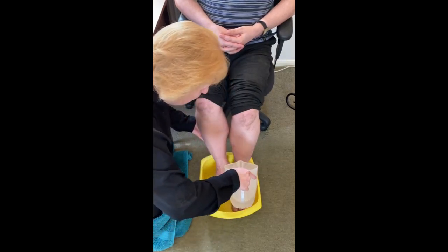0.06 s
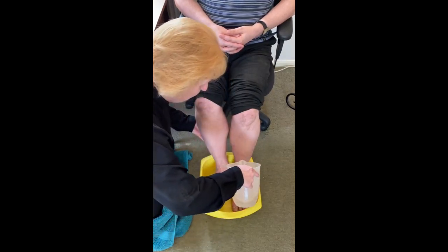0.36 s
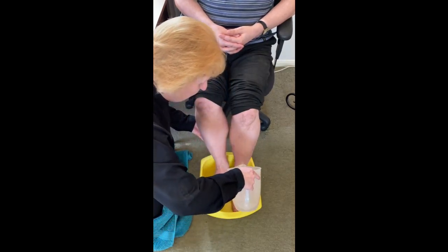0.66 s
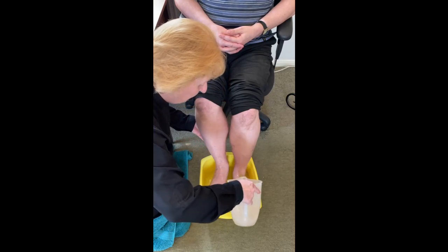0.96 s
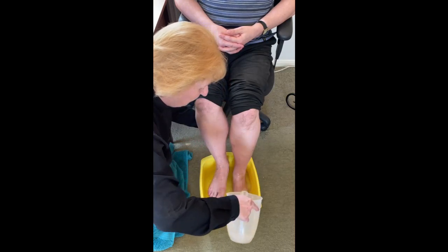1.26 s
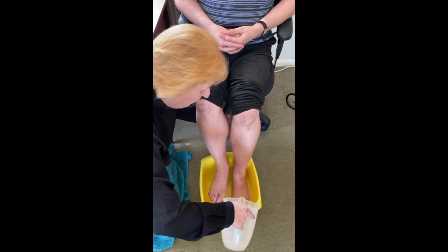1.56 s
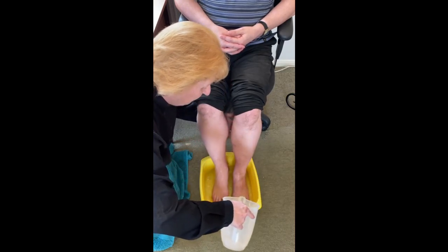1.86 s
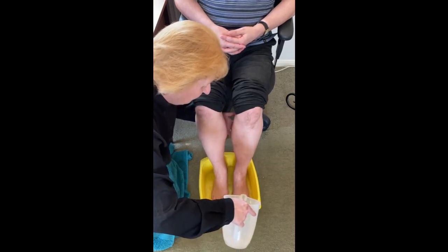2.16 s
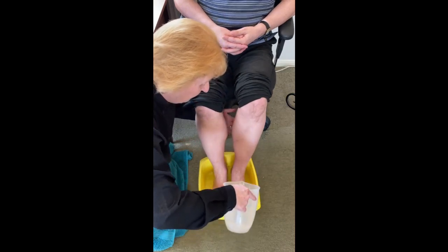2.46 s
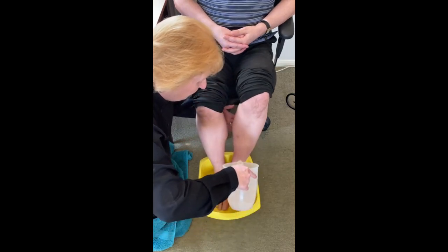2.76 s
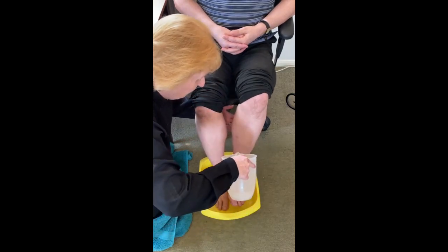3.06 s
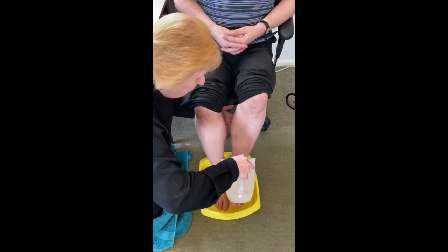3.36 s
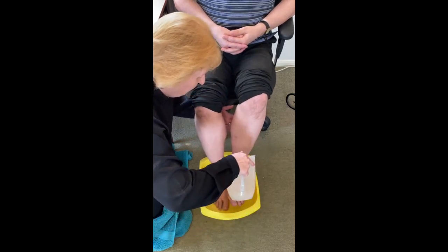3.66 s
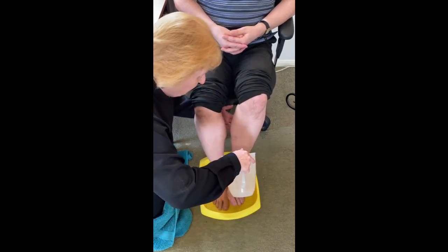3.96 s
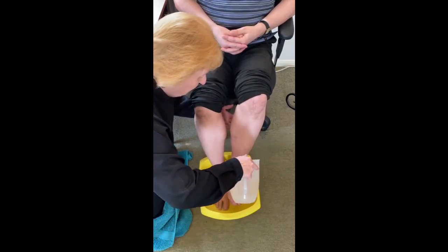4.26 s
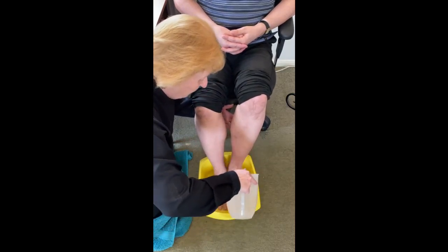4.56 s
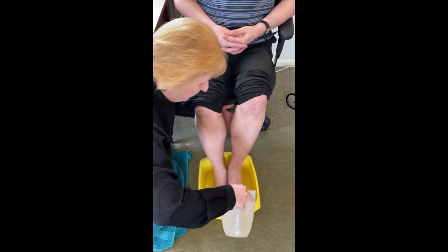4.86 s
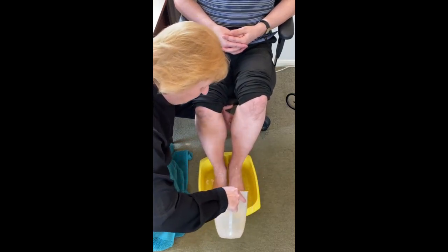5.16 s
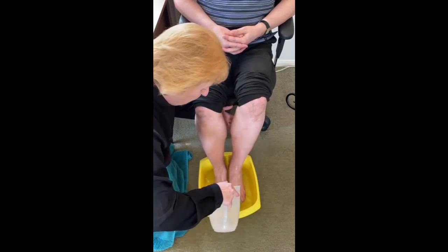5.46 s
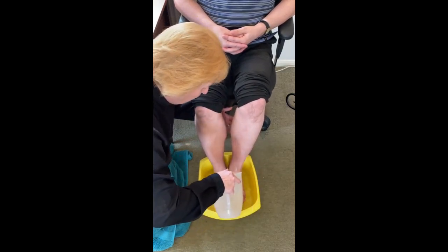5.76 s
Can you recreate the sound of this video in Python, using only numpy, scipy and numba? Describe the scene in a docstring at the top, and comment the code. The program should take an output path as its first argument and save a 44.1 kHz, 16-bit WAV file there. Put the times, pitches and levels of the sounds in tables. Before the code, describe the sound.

Water is poured from a jug over two feet into a plastic basin. A brief splash and a few plinks lead into the first pour, which patters on skin, bubbles and gives one hollow pop. The water runs off and thins to drips, slaps and trickles. The jug softly knocks the basin, which rumbles low under a second pour in short gushes. A small microphone listens from above in a small carpeted room.

```python
"""Water is poured from a jug over two feet into a plastic basin, in a small carpeted room.
A brief splash and a few plinks lead into the first pour, which patters on skin, traps ringing bubbles
and gives one hollow pop. The water runs off and thins to drips, slaps and trickles. Near 4 s the jug
knocks the basin, which rumbles on under a second pour in short gushes.
A small microphone with two openings (ports) listens from above."""
import sys
import numpy as np
from scipy import signal
from scipy.fft import rfft, irfft, next_fast_len
from scipy.io import wavfile
from scipy.ndimage import uniform_filter1d
from numba import njit

SR = 44100
rng = np.random.default_rng(int(sys.argv[2]) if len(sys.argv) > 2 else 0)


def to_wav(sig):
    """Store sig (one row per channel, or 1-D mono) as 16-bit WAV at the path in sys.argv[1].

    Samples outside -1..1 are clipped; the rate is SR.
    """
    pcm = np.clip(np.atleast_2d(sig), -1, 1) * 32767
    pcm = np.round(pcm).astype(np.int16)
    wavfile.write(sys.argv[1], SR, pcm.T)  # frames by channels


N = 260190
TIME = np.arange(N) / SR


def from_db(db):
    """Turn decibels into a gain to multiply by."""
    return 10 ** (np.asarray(db) / 20)


def rms_one(x):
    """Scale a signal so that its average strength (rms) is 1."""
    return x / np.sqrt(np.mean(x ** 2) + 1e-20)


def at_hz(points, hz):
    """Read between the rows of a table, on a scale of octaves."""
    points = np.array(points)
    return np.interp(np.log(np.maximum(hz, 1)), np.log(points[:, 0]), points[:, 1])


def filtered(x, response):
    """Multiply each frequency in a sound by response(frequency)."""
    size = next_fast_len(x.shape[-1] + SR // 10, real=True)
    hz = np.arange(size // 2 + 1) * SR / size
    return irfft(rfft(x, size) * response(hz), size)[..., :x.shape[-1]]


def coloured(x, spectrum):
    """Shape a sound's tone with a table of levels; rms 1."""
    return rms_one(filtered(x, lambda hz: from_db(at_hz(spectrum, hz))))


def drift(per_s):
    """A random wander that heads for a new value per_s times a second; rms 1."""
    targets = rng.standard_normal(N // 50)
    return rms_one(np.interp(TIME * per_s, np.arange(len(targets)), targets))


def add(out, start, sound):
    """Mix a sound in at its start time, at a random landing spot."""
    at = int(np.clip(round(start * SR), 0, N - 1))
    out[rng.integers(len(out)), at:at + len(sound)] += sound[:N - at]


def swell(start, rise, hold, fall_db_per_s):
    """A loudness curve that climbs to 1, holds and fades, all within a second."""
    out, at = np.zeros(N), max(int(start * SR), 0)
    t = TIME[:min(SR, N - at)]
    fall = from_db(-fall_db_per_s * np.maximum(t - rise - hold, 0))
    out[at:at + len(t)] = np.minimum(t / max(rise, .001), 1) * fall
    return out


# Gushes from the jug; glugs are big bubbles, gurgle is smaller ones, spray is the patter on skin:
# (start [s], rise [s], hold [s], glugs [dB], gurgle [dB], spray [dB])
JUG_GUSHES = [(0.0, 0.0014, 0.032, -62.5, -47, -51.5), (0.694, 0.062, 0.15, -60.5, -51.5, -48.5),
              (0.841, 0.039, 0.12, -48.5, -42, -46.5), (1.001, 0.11, 0.21, -46, -39, -46),
              (1.323, 0.036, 0.058, -54, -42, -45.5), (2.179, 0.034, 0.014, -57.5, -53.5, -61),
              (3.343, 0.061, 0.07, -58, -57.5, -70), (4.066, 0.011, 0.028, -48, -45.5, -45.5),
              (4.165, 0.041, 0.047, -52, -48.5, -46.5), (4.30, 0.15, 0.018, -52.5, -48.5, -56),
              (4.502, 0.023, 0.077, -53, -46.5, -43.5), (4.857, 0.04, 0.054, -49, -60, -69),
              (4.992, 0.024, 0.12, -53, -50.5, -51), (5.245, 0.0076, 0.12, -53.5, -52.5, -46.5),
              (5.582, 0.059, 0.071, -52, -52.5, -48.5), (5.733, 0.021, 0.038, -62, -56.5, -45.5),
              (5.821, 0.02, 0.045, -64, -47, -60)]
# The film of water running off the feet: (time [s], level [dB])
FEET_RUNOFF = [(0, -49), (0.25, -56.5), (0.7, -54), (1.35, -45.5), (1.8, -45.5), (2.15, -50), (2.38, -48.5),
               (2.53, -55), (2.72, -68.5), (2.93, -65.5), (2.965, -79), (3.055, -92), (3.075, -64.5),
               (3.3, -63), (3.5, -58.5), (3.95, -67.5), (4.7, -52), (5.9, -55.5)]
# Added to that level: (glugs [dB], gurgle [dB], spray [dB])
RUNOFF_MIX = [-23, -7.5, -1]


def flow():
    """How strong the glugs, gurgle and spray are over time: run-off, gushes and each slap's wash."""
    runoff_db = np.interp(TIME, *np.transpose(FEET_RUNOFF))
    power = np.outer(from_db(RUNOFF_MIX), from_db(runoff_db)) ** 2
    for start, rise, hold, *levels_db in JUG_GUSHES:
        power += np.outer(from_db(levels_db), swell(start, rise, hold, fall_db_per_s=150.5)) ** 2
    for start, db, hz, _ in WATER_SLAPS:
        glug_share = min(1480 / hz, 1) ** 2   # smaller lumps slap higher and leave fewer glugs
        mix = from_db([-30, -34.5, -42.5]) * [glug_share, 1, 1]
        wash = swell(start, rise=.01, hold=0, fall_db_per_s=220)
        power += np.outer(from_db(db) * mix, wash) ** 2
    return np.sqrt(power)


@njit
def ring_out(born, spot, sizes, phase_step, fade, climb, shape):
    """Add up many bubbles, each a sine wave whose pitch climbs as it fades."""
    out = np.zeros(shape)
    for k in range(len(born)):
        life = int(7 / fade[k])
        size, phase = sizes[k], 0.0
        for i in range(min(life, shape[1] - born[k])):
            out[spot[k], born[k] + i] += size * np.sin(phase)
            phase += phase_step[k] * (1 + climb * i / life)
            size *= 1 - fade[k]
    return out


def swarm(low_hz, high_hz, surge, base_per_s, cycles, spread_db, climb, clump_db):
    """Clumps of bubbles of uneven strength, pitch and life; one row for each landing spot."""
    busyness = surge * from_db(clump_db * drift(130))
    born = np.flatnonzero(rng.random(N) < base_per_s * busyness / SR)
    strength, sign, pitch, life, place = rng.random((5, N), dtype=np.float32)[:, born].astype(float)
    hz = low_hz * (high_hz / low_hz) ** pitch
    sizes = from_db(spread_db * np.minimum(-np.log(1 - strength), 3)) * np.sign(sign - .5)
    # the fewer the bubbles, the more each one stands out
    sizes = sizes * hz / low_hz / np.sqrt(uniform_filter1d(busyness, SR // 14)[born])
    fade = np.minimum(np.log(1000) * hz / (cycles * (.5 + life) * SR), .5)
    spot = (place * len(SPOTS)).astype(np.int64)
    return ring_out(born, spot, sizes, 2 * np.pi * hz / SR, fade, climb, (len(SPOTS), N))


# The tone of the glugs and gurgle: (frequency [Hz], level [dB])
WATER_TONE = [(130, -7.5), (290, -6), (450, 0.5), (620, -4), (850, -1), (1400, -0.5), (2400, 3.5),
              (4200, -0.5), (6000, 12.5)]
# The tone of the spray: (frequency [Hz], level [dB])
SPRAY_TONE = [(3000, -1.5), (4300, -2.5), (6200, -3.5), (7500, -1.5), (10000, -7), (13000, -5), (16000, -5)]


def stream(glug_gain, gurgle_gain, spray_gain):
    """Running water arrives in surges; a stronger flow makes more bubbles and more spray."""
    surge = from_db(2.5 * drift(50)) * (gurgle_gain / gurgle_gain.max()) ** .36
    glugs = swarm(215.4, 1055, surge, base_per_s=950, cycles=15, spread_db=8, climb=.22, clump_db=3)
    gurgle = swarm(1037, 4060, surge, base_per_s=750, cycles=27.6, spread_db=6, climb=.48, clump_db=3.5)
    fizz = swarm(4070, 13750, surge, base_per_s=2600, cycles=56, spread_db=9, climb=.16, clump_db=5.5)
    patter = swarm(2970, 18400, surge, base_per_s=2500, cycles=8.4, spread_db=4, climb=0, clump_db=7.5)
    spray = rms_one(fizz) + from_db(-3) * rms_one(patter)
    return (glug_gain * coloured(glugs, WATER_TONE)
            + gurgle_gain * coloured(gurgle, WATER_TONE)
            + spray_gain * coloured(spray, SPRAY_TONE))


def stereo_noise(spectrum, side_db):
    """Shaped noise; the lower side_db is, the more alike left and right are."""
    mid, side = coloured(rng.standard_normal((2, N)), spectrum)
    return mid + from_db(side_db) * side * [[1], [-1]]


# The tone of the water heaving in the basin: (frequency [Hz], level [dB])
HEAVE_TONE = [(20, -29), (45, -4), (70, 0.5), (110, -1), (170, -6), (300, -21.5)]


def basin_heave(glug_gain):
    """The water rumbles a little at rest, more under the glugs, and stays stirred once the jug knocks."""
    resting, under_glugs = from_db(-65), from_db(-7) * glug_gain
    stirred = from_db(-52) * np.clip((TIME - 3.93) / 0.055, 0, 1)
    level = np.sqrt(resting ** 2 + under_glugs ** 2 + stirred ** 2)
    sway = from_db(2.4 * drift(8.3))
    return level * sway * stereo_noise(HEAVE_TONE, side_db=-13.5)


# The tone of the still room: (frequency [Hz], level [dB])
AIR_TONE = [(20, -40), (60, -12.5), (150, -14), (500, -19), (2000, -53.5), (16000, -51.5)]


def room_air():
    """Still air makes a faint, low, steady hush."""
    return from_db(-66) * stereo_noise(AIR_TONE, side_db=-5.5)


def bubble(hz, t60, swell_cycles=2.2, climb=0.12):
    """Trapped air rings, fading 60 dB in t60 seconds; its pitch climbs as it nears the surface."""
    t, t60 = TIME[:SR // 16], max(t60, .001)
    loudness = from_db(-60 * t / t60) * (1 - np.exp(-(t * hz / swell_cycles) ** 2))
    phase = 2 * np.pi * hz * (t + climb * t * t / (2 * (t + t60)))
    return loudness / loudness.max() * np.sin(phase)


def spit(t60, low_hz, high_hz):
    """The short, bright burst of noise from a drop breaking up; peak 1."""
    t = TIME[:SR // 20]
    burst = rng.standard_normal(len(t)) * from_db(-60 * t / t60) * np.minimum(t / .0015, 1)
    burst = signal.sosfilt(signal.butter(2, low_hz, "high", fs=SR, output="sos"), burst)
    burst = signal.lfilter([1], [1, -np.exp(-2 * np.pi * high_hz / SR)], burst)   # soften the treble
    return burst / np.abs(burst).max()


# Single bubbles that ring out: (time [s], peak [dB], pitch [Hz], length to fade by 60 dB [cycles])
PLINK_BUBBLES = [(0.192, -24.5, 4930, 11), (0.2897, -29.5, 2340, 26), (0.448, -28.5, 2040, 14),
                 (0.5487, -20, 1990, 13), (0.6305, -26.5, 1940, 36), (0.833, -26.5, 2280, 18),
                 (1.138, -27, 980, 12), (1.3811, -13, 2150, 3.5), (1.6036, -19, 4830, 18),
                 (1.6891, -26, 2140, 25), (2.2415, -22, 2580, 2), (2.609, -37.5, 2780, 72),
                 (2.941, -36.5, 1710, 14), (3.40, -27, 1180, 7), (3.427, -27.5, 1270, 5),
                 (3.4762, -25, 2330, 11), (4.068, -12.5, 3920, 3.5), (4.282, -25.5, 1960, 41),
                 (4.404, -29, 1790, 16), (4.429, -29, 1900, 11), (4.54, -24, 1880, 33),
                 (4.755, -27, 1810, 66), (4.876, -23, 1740, 50), (4.994, -20.5, 1500, 19),
                 (5.0367, -25.5, 2000, 45), (5.073, -23, 4560, 65), (5.14, -28, 3040, 31),
                 (5.247, -26, 3230, 33), (5.3, -28, 1770, 30), (5.5491, -26.5, 4040, 29)]


def plinks():
    """Each bubble is born with a faint spit, and three quieter bubbles break off it."""
    out = np.zeros((len(SPOTS), N))
    for start, db, hz, cycles in PLINK_BUBBLES:
        add(out, start, from_db(db) * bubble(hz, t60=cycles / hz))
        add(out, start, from_db(db - 11.5) * spit(t60=0.025, low_hz=hz, high_hz=3000))
        for wait, detune in rng.random((3, 2)):
            pitch = hz * 2 ** (detune - .5)
            add(out, start + wait * .018, from_db(db - 13) * bubble(pitch, t60=7.7 / pitch))
    return out


# Lumps of water hitting the surface: (time [s], peak [dB], centre pitch [Hz], spit against peak [dB])
WATER_SLAPS = [(0.352, -30.5, 4600, 1.5), (0.868, -29, 600, -16), (1.034, -19.5, 1110, 0.5),
               (1.183, -18.5, 1320, -10), (1.311, -23.5, 810, -13), (2.242, -36.5, 760, 5),
               (2.738, -34.5, 1640, -12), (3.075, -31.5, 1570, -8), (3.571, -27.5, 1210, -23),
               (3.681, -32.5, 2220, -9), (3.751, -31.5, 1270, -30), (3.834, -29, 1522, -12),
               (4.024, -26, 2750, -1), (4.166, -21.5, 1130, -24), (4.31, -24.5, 1600, -17),
               (4.489, -22, 870, -9.5), (4.608, -32.5, 1600, 13), (4.912, -24.5, 1520, -6),
               (5.866, -27, 1450, 2)]


def slaps(bubble_count=12):
    """A lump of water spits, then opens a hollow that breaks into a cluster of short bubbles."""
    out = np.zeros((len(SPOTS), N))
    for start, db, hz, spit_db in WATER_SLAPS:
        cluster = np.zeros(N // 50)
        for k, (detune, wait) in enumerate(rng.standard_normal((bubble_count, 2))):
            pitch = np.clip(hz * 2 ** (0.43 * detune * min(k / 2, 1)), 250, 9000)
            ring = bubble(pitch, t60=12 / pitch, swell_cycles=0.48, climb=0.57)
            lag = int(min(abs(wait) * k * .0011, .04) * SR)
            cluster[lag:lag + len(ring)] += from_db(-1.5 * k) * np.sign(wait) * ring
        add(out, start, from_db(db) * cluster / np.abs(cluster).max())
        add(out, start, from_db(db + spit_db) * spit(t60=0.025, low_hz=2970, high_hz=5000))
    return out


# The tones that make up the pop: (pitch [Hz], peak [dB], time to fade by 60 dB [s])
POP_TONES = [(1900, -15, 0.0075), (3000, 0, 0.0017), (3780, -4, 0.006)]


def hollow_pop(start=1.1206):
    """One hard pop in the first pour: three very short tones ring together."""
    out = np.zeros((len(SPOTS), N))
    for hz, db, t60 in POP_TONES:
        add(out, start, from_db(db) * bubble(hz, t60, swell_cycles=1.7, climb=.02))
    return out


# Drops landing on skin and plastic: (time [s], peak [dB])
DROP_TICKS = [(1.364, -11), (1.480, -16.5), (1.965, -14), (2.32, -20), (2.851, -32.5), (2.921, -33.5),
              (3.140, -34.5), (3.322, -34), (3.467, -27.5), (3.647, -24), (4.22, -19.5), (5.301, -15),
              (3.982, -26)]


def ticks():
    """A drop hits something solid and bursts with a tiny, sharp tick."""
    out = np.zeros((len(SPOTS), N))
    for start, db in DROP_TICKS:
        add(out, start, from_db(db) * spit(t60=0.0065, low_hz=5460, high_hz=6700))
    return out


# Runs of bubbles: (start [s], length [s], typical peak [dB], pitch [Hz])
TRICKLE_RUNS = [(1.561, 0.14, -32, 2020), (2.285, 0.16, -37.5, 3440), (3.401, 0.074, -43, 1140),
                (3.678, 0.091, -47, 461), (3.772, 0.15, -44.5, 2010), (3.481, 0.16, -45, 2720),
                (5.446, 0.052, -38, 1390), (5.624, 0.09, -41, 500)]


def trickles(max_bubbles=12, gap_s=0.016):
    """A thin thread of water traps one bubble after another, all of nearly one size."""
    out = np.zeros((len(SPOTS), N))
    for start, length, db, hz in TRICKLE_RUNS:
        for k, (wait, detune, strength) in enumerate(rng.uniform(-1.1, 1, (max_bubbles, 3))):
            delay = gap_s * (k + (wait + 1) / 2)
            pitch = hz * 2 ** (0.11 * detune)
            gain = from_db(db + 6.5 * strength) * (delay < length)
            add(out, start + delay, gain * bubble(pitch, t60=17.6 / pitch))
    return out


# Soft knocks against the basin: (time [s], peak [dB], pitch [Hz])
BASIN_KNOCKS = [(2.236, -46, 168), (3.946, -41.5, 125), (3.994, -40, 92)]


def knocks(t60=0.13):
    """The plastic basin answers each knock with one low, dull tone."""
    out = np.zeros(N)
    for start, db, hz in BASIN_KNOCKS:
        loudness = from_db(db) * swell(start, rise=0.0084, hold=0, fall_db_per_s=60 / t60)
        out += loudness * np.sin(2 * np.pi * hz * (TIME - start))
    return out


# How long the room rings: (frequency [Hz], time to fade by 60 dB [s])
ECHO_FADE = [(150, 0.59), (700, 0.2), (2000, 0.28), (6000, 0.16), (16000, 0.24)]
# How alike the echoes are on the left and right: (frequency [Hz], likeness [0 to 1])
ECHO_LIKENESS = [(100, 0.93), (500, 0.06), (2000, 0.042), (5500, .05), (7000, 0.64), (16000, 0.24)]


def room_echoes(x, first_s=0.0011, early_db=-5.5, early_t60=0.15, absorb_hz=7700):
    """Each spot has its own echoes: quick ones from basin, legs and floor, then the room's slower fade."""
    t = TIME[:SR // 3]
    noise = rfft(rng.standard_normal((2, len(SPOTS), 1, len(t))))
    noise_hz = np.arange(noise.shape[-1]) * SR / len(t)
    band_edges = np.geomspace(60, 18000, 10)
    echoes = 0
    for low, high in zip(band_edges, band_edges[1:]):
        hz = np.sqrt(low * high)
        mid, side = irfft(noise * ((noise_hz >= low) & (noise_hz < high)), len(t))
        alike = at_hz(ECHO_LIKENESS, hz)
        stereo = np.sqrt(1 + alike) * mid + np.sqrt(1 - alike) * side * [[1], [-1]]
        decay = from_db(-60 * t / at_hz(ECHO_FADE, hz)) + from_db(early_db - 60 * t / early_t60)
        decay *= np.clip(t / first_s - 1, 0, 1)   # silent until the first echo arrives
        kept = 1 / np.sqrt(1 + (hz / absorb_hz) ** 2)   # carpet and clothes swallow the treble
        echoes = echoes + kept * decay / np.sqrt(2 * np.sum(decay ** 2)) * stereo
    return signal.oaconvolve(x[:, None], echoes, axes=2).sum(axis=0)[:, :N]


# The four spots in the basin where water lands, one value each: (left minus right [dB])
SPOTS = [-0.91, 0.29, 0.95, 0.87]


def scene():
    """Mix the water, its echoes, the basin and the air; single drops echo less than the splashing."""
    glug_gain, gurgle_gain, spray_gain = flow()
    splash = stream(glug_gain, gurgle_gain, spray_gain) + slaps() + trickles()
    drops = plinks() + hollow_pop() + ticks()
    direct = from_db(np.outer([.5, -.5], SPOTS)) @ (splash + drops)   # four spots into left and right
    echoes = room_echoes(from_db(2.9) * splash + from_db(-3.5) * drops)
    return direct + echoes + basin_heave(glug_gain) + knocks() + room_air()


# The balance of the microphone's two ports: (frequency [Hz], left minus right [dB])
MIC_BALANCE = [(100, 1.5), (900, 0.2), (2500, 2), (5000, 4), (7500, 1), (9500, -1.5), (16000, 0.5)]


def record(dry, crossover_hz=5600, bass_lag_s=.000012, treble_lag_s=.000225, cutoff_hz=16100):
    """The two ports differ in level and timing; the highest peaks are rounded and the top treble is cut."""
    def left_port(hz):
        """Above the crossover, the left port's wave is flipped upside down and lags more."""
        treble = 1 / (1 + (crossover_hz / np.maximum(hz, 1)) ** 24)
        bass_phase = -2 * np.pi * hz * bass_lag_s
        treble_phase = np.pi - 2 * np.pi * hz * treble_lag_s
        phase = (1 - treble) * bass_phase + treble * treble_phase
        return from_db(at_hz(MIC_BALANCE, hz) / 2) * np.exp(1j * phase)
    left = filtered(dry[0], left_port)
    right = filtered(dry[1], lambda hz: from_db(-at_hz(MIC_BALANCE, hz) / 2))
    treble_cut = signal.ellip(12, .1, 80, cutoff_hz, fs=SR, output="sos")
    return signal.sosfilt(treble_cut, np.tanh([left, right]))


dry = scene()
out = record(dry)
to_wav(out)
```